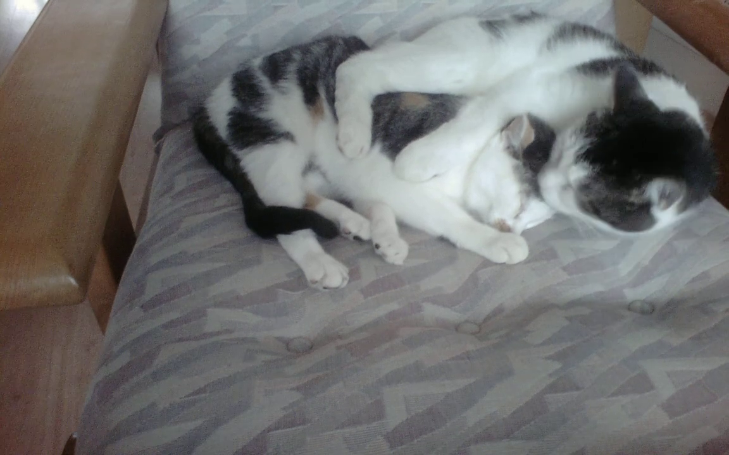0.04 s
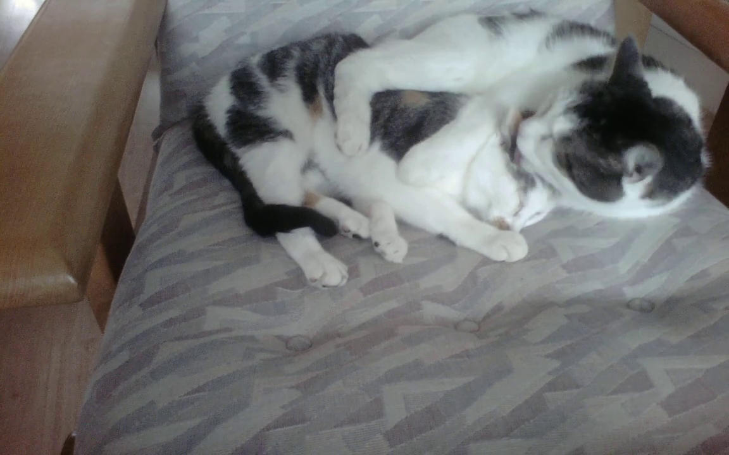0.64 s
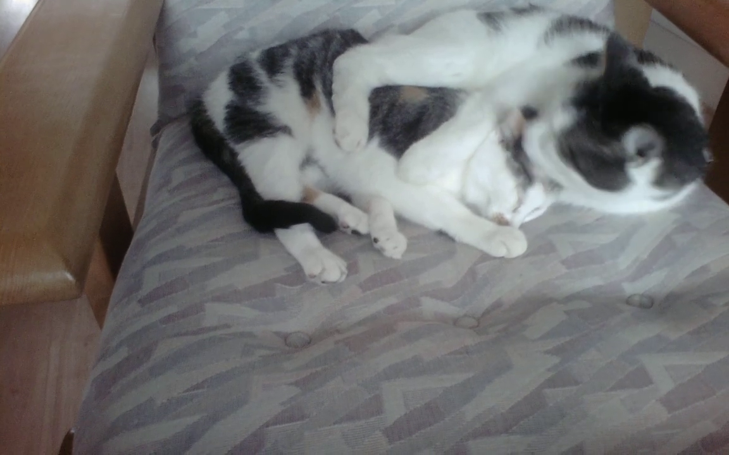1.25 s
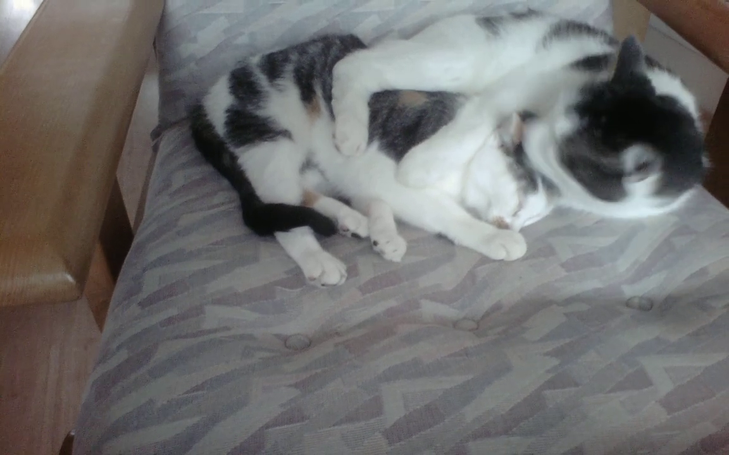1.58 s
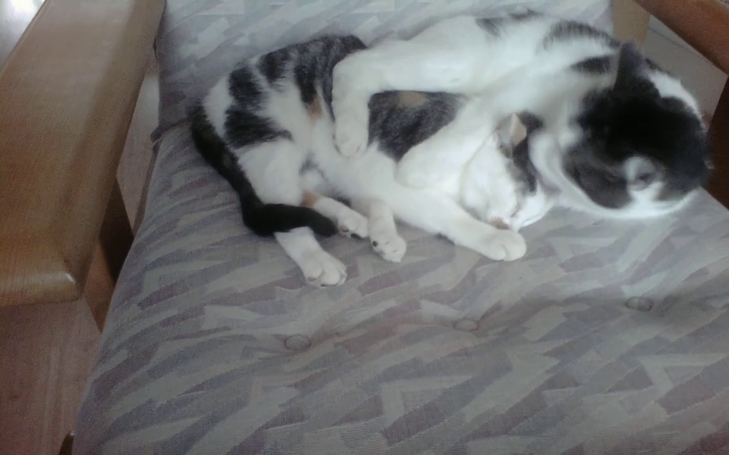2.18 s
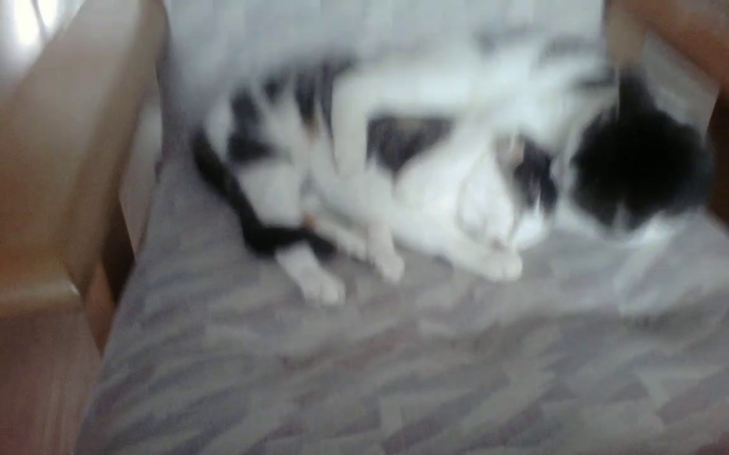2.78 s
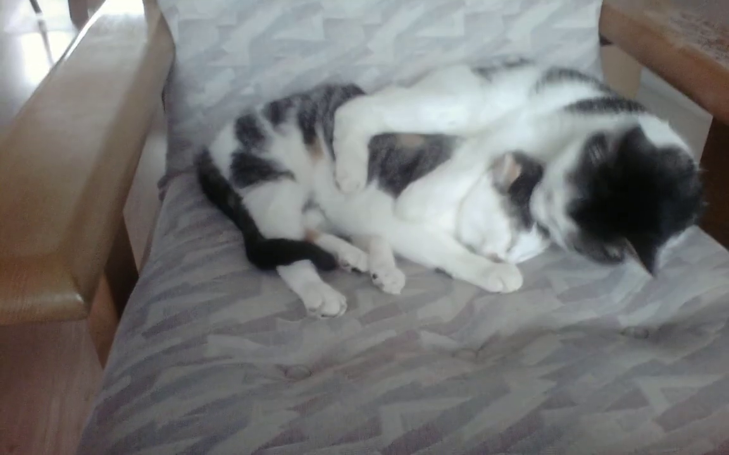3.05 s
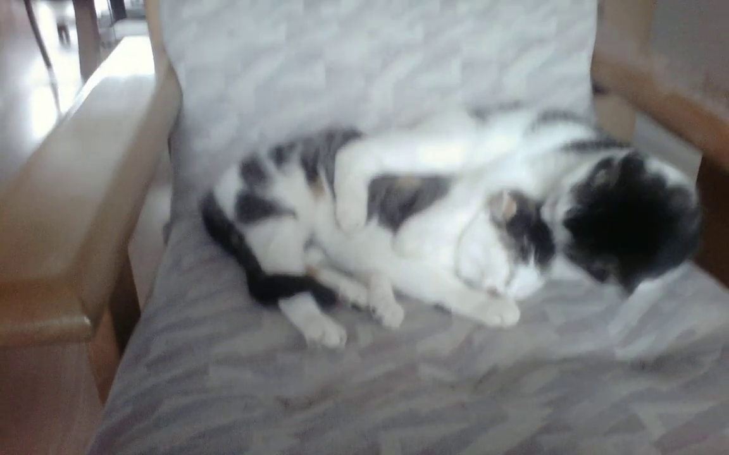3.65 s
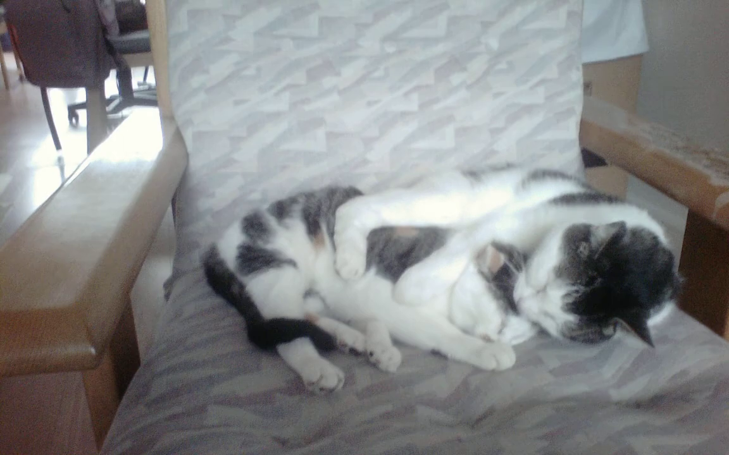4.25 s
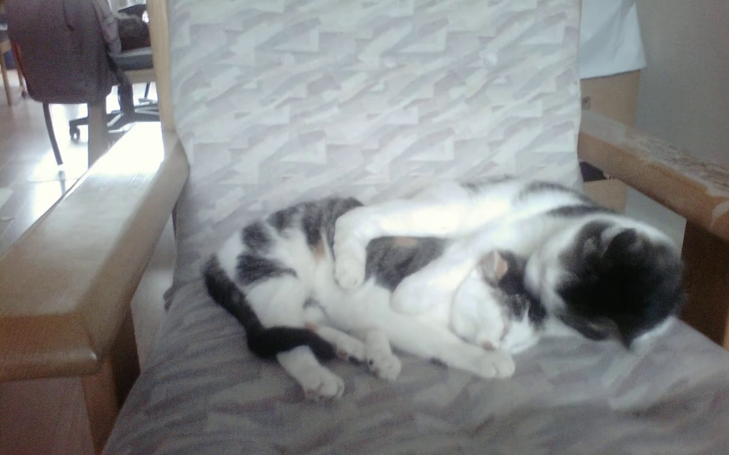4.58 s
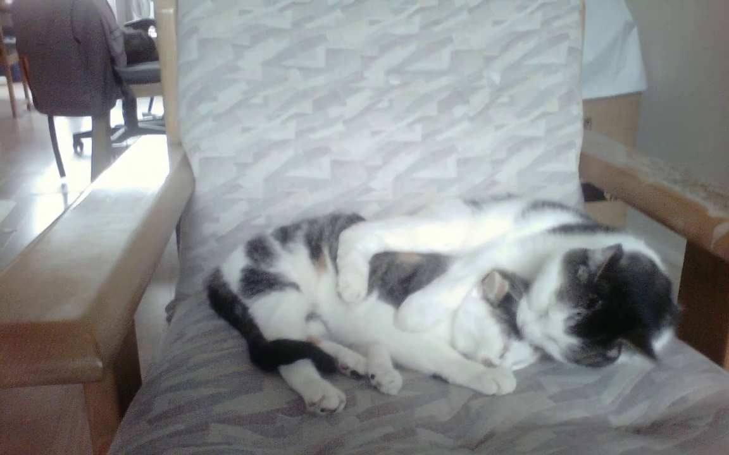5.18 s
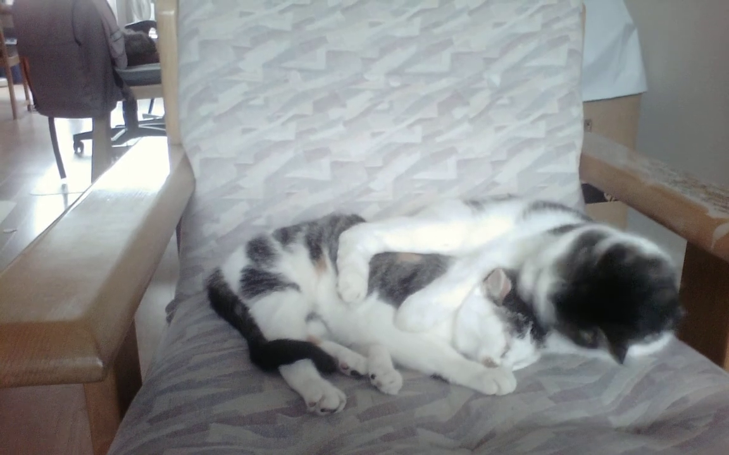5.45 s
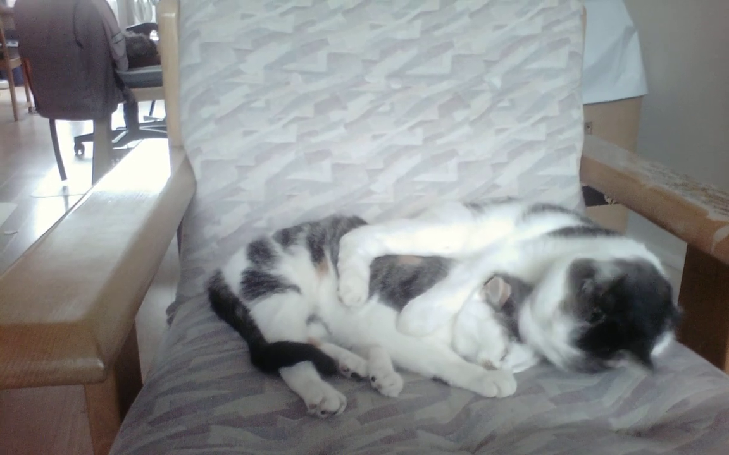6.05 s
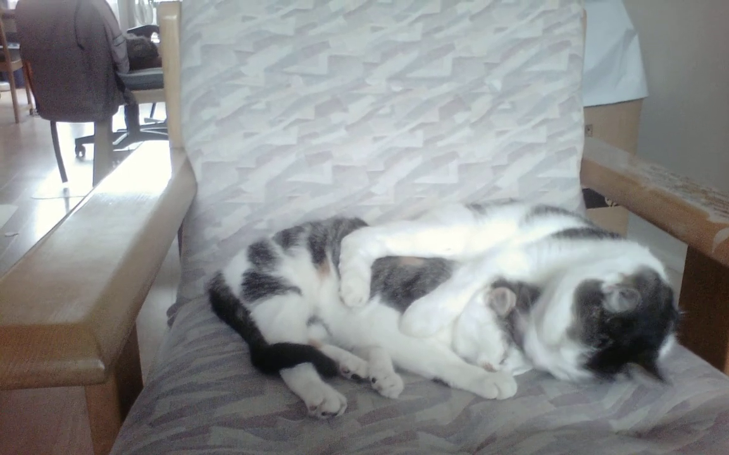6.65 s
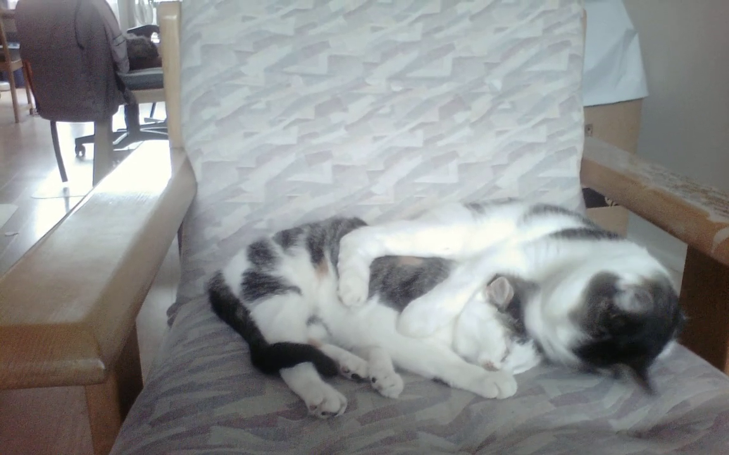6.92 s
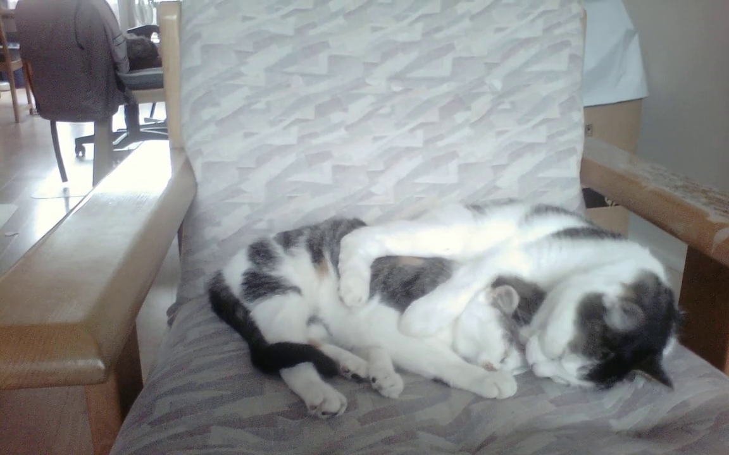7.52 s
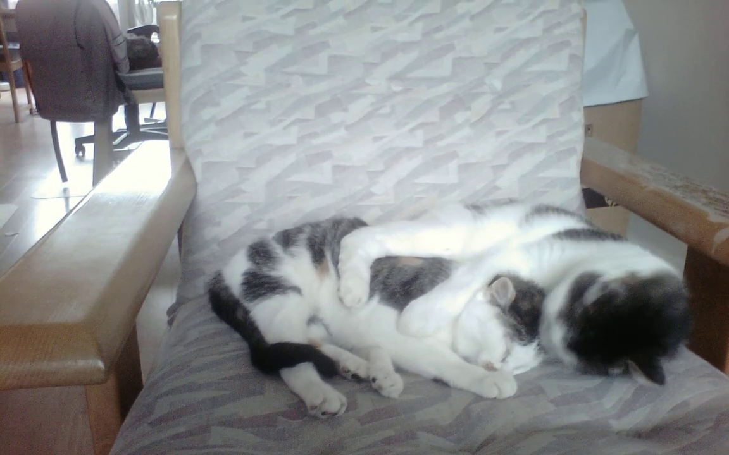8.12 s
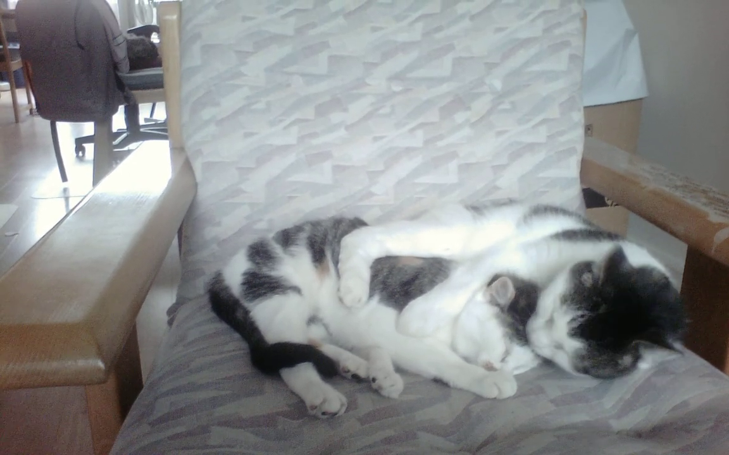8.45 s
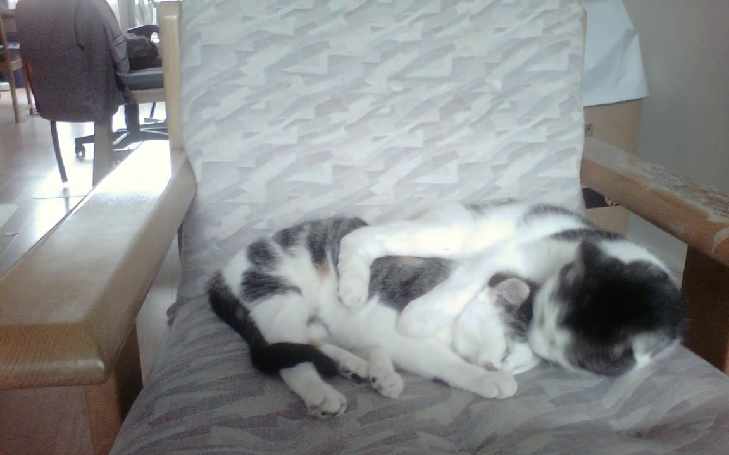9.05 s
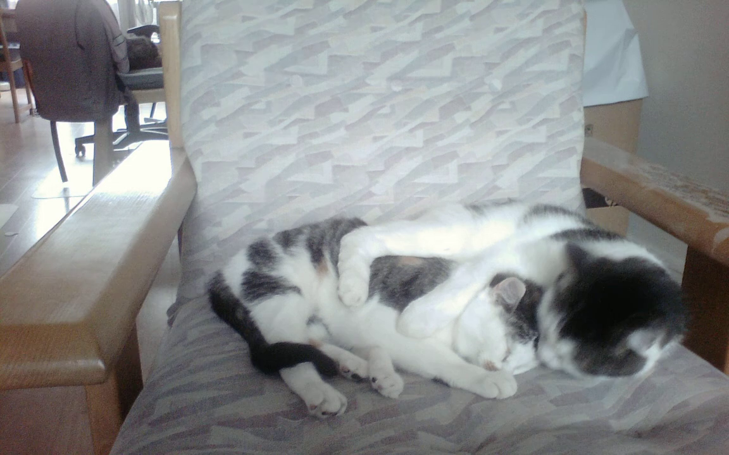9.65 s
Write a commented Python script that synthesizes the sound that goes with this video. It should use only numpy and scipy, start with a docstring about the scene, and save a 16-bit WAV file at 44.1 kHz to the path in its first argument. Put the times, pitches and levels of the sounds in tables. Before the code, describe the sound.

Small handling noises sound right at the microphone of a hand-held camera in a still living room. First comes a sharp plastic click with a short rub, then a cluster of softer clicks and thin finger squeaks, and later some faint ticks and scuffs. Underneath, a steady low-level hiss, room air, a slight hum and a high electronic whine carry on unchanged.

```python
"""Camera handling in a quiet living room.

A small hand-held camera is tilted while a cat rests, unheard, on an armchair. Seams of the plastic
case slip and click, ringing its modes; a finger sticks and slips on it, rubbing and squeaking.
The microphone's cavity rings near 4 kHz. Room air, hiss, a faint hum and electronic whine run on."""
import sys
import numpy as np
from scipy import signal
from scipy.fft import rfft, irfft
from scipy.io import wavfile

SR = 44100
rng = np.random.default_rng(int(sys.argv[2]) if len(sys.argv) > 2 else 0)


def dump_mix(stems):
    """Bounce the given channels to the path in sys.argv[1] as a 16-bit WAV at rate SR."""
    frames = np.atleast_2d(stems).T  # one column per channel
    limited = np.clip(frames, -1, 1)  # hard clip at full scale
    pcm = np.round(limited * 32767).astype(np.int16)
    wavfile.write(sys.argv[1], SR, pcm)


N = 436590
TIME_S = np.arange(N) / SR

# Case clicks. Each row: start in seconds, strength in dB, weight in dB, brightness in dB,
# place on the panel from 0 to 1.
CASE_CLICKS = [(2.3128, -45.5, 6, 12, 0.1), (2.33, -27.5, -3.5, -12, 0.2), (2.616, -51.5, -4, -18, .5),
               (3.6774, -33.5, -4, -15, 0.68), (4.335, -38, 2.5, -11, 0.6), (4.52, -50.5, 3.5, -3, .6),
               (4.5311, -36.5, -5.5, -4, 0.9), (4.6249, -49.5, -8, 4.5, 0.6), (4.877, -56.5, -3, 1, .5),
               (5.0946, -49, -0.5, -6.5, 0.7), (6.2185, -46.5, 3, 1, 1)]
# Click drive of thump, knock, panel, shell, ping and snap, in that order.
# Each row: offset in dB, share of the click's weight, share of its brightness.
MODE_DRIVE = [(-20.5, 2.35, 0.49), (-11, 1.3, 0.098), (-10, 1.38, -0.21), (0.5, 0, 0.014), (-5.5, 0, 0.37),
              (-0.4, 0.36, 0.93)]
# Case modes, low to high. Each row: frequency in Hz, relative level in dB, t60 in seconds.
THUMP_MODES = [(231, 0.5, 0.074), (338, -2, 0.063), (560, 1, 0.082)]
KNOCK_MODES = [(720, -6, 0.045), (940, -4.5, 0.025), (1403, 3.5, 0.007)]
PANEL_MODES = [(1844, -1, 0.02), (2390, 2, 0.016)]
SHELL_MODES = [(2620, -8, 0.0021), (3140, 7, 0.0046), (3760, 1, 0.017)]
PING_MODES = [(4040, -12, 0.049), (4055, 4, 0.034)]
SNAP_MODES = [(4700, 6.5, 0.0075), (5330, 4, 0.0089), (5720, 1, 0.0091)]
# Light touches. Each row: start in seconds, strength in dB.
TOUCH_TICKS = [(3.668, -59), (5.056, -61), (5.251, -59), (5.685, -62), (6.17, -59), (6.382, -60.5),
               (6.507, -57.5), (9.616, -62)]
# Finger strokes. Each row: start in seconds, length in seconds, relative levels of dull rub, squeak
# and scuff in dB, pressure change in dB, squeak pitch in Hz.
FINGER_STROKES = [(0.477, 0.33, -76, -62, -78, -2, 3960), (2.277, 0.039, -66, -67, -60.5, 23, 4080),
                  (2.353, 0.17, -46.5, -46.5, -45.5, -26, 4000), (2.446, .016, -64, -52, -58, -2, 5420),
                  (3.7, 0.22, -59.5, -48, -72, -6.5, 3970), (3.963, 0.12, -59, -50, -71, -10, 4130),
                  (4.14, .095, -57, -47, -74, -14.5, 4030), (4.547, .04, -67, -45, -69, -12, 4010),
                  (4.643, .055, -60, -46, -59, -18, 3990), (4.896, .1, -68, -52.5, -75, -4, 4010),
                  (6.448, .045, -63, -53, -55, -8, 5170), (6.535, 0.095, -62, -58.5, -56, -1.5, 4100),
                  (8.717, 0.4, -78, -62, -78, -9, 4040)]
# Noise spectra. Each row: frequency in Hz, relative density in dB.
AIR_SPECTRUM = [(15, -54), (25, -37), (91, -46), (110, -19), (126, -11.5), (193, -7), (229, -1.5),
                (337, -7), (441, -6), (818, -6), (1010, -2.5), (1200, -5), (1670, -5), (1950, -7),
                (2500, -15.5), (3250, -37), (5500, -120)]
MIC_HISS_SPECTRUM = [(1500, -14.5), (2300, -2), (3000, 1), (3600, 0.5), (4600, -1.5), (5600, -2.5),
                     (6200, -3), (7100, -7), (7700, -15), (8400, -22), (11000, -49)]
ELECTRONICS_SPECTRUM = [(100, -10), (4000, -0.5), (10000, 0.5), (16000, 0)]
# Noise level curves. Each row: time in seconds, level in dB before gain.
AIR_CURVE = [(0.0, -59), (2.53, -56.5), (2.76, -58.5), (4.19, -57.5), (5.16, -60), (6.2, -59), (6.78, -60),
             (9.9, -57.5)]
MIC_HISS_CURVE = [(0.0, -67), (2.18, -65), (5.65, -66.5), (6.26, -66), (7.66, -67), (9.9, -64.5)]
CAVITY_CURVE = [(0.0, -64.5), (2.42, -64), (3.03, -66), (3.69, -60.5), (3.86, -55.5), (5.27, -66.5),
                (8.38, -66.5), (8.82, -62), (9.9, -63)]
# Electronic whine; hum with one faint whistle. Each row: frequency in Hz, level in dB before gain.
WHINE_TONES = [(1034, -73), (2078, -74.5), (3112, -79.5), (4000, -67.5)]
HUM_TONES = [(224.3, -75), (244, -84.5), (313, -78), (8000, -95)]
# Dips in the microphone's response. Each row: frequency in Hz, width in Hz.
MIC_NOTCHES = [(2000, 28), (4000, 16), (6000, 36)]

CAVITY_HZ, CAVITY_WIDTH_HZ = 3993, 116


def case_clicks(place_db):
    """A seam slips and drives the case modes; its place favours the lower or upper panel mode."""
    out = np.zeros(N)
    for start_s, strength_db, weight_db, bright_db, place in CASE_CLICKS:
        force = slip_force(grit=0.15, grit_s=0.003, tail_db=-47, tail_s=0.064)
        panel = [(hz, db + place_db * share, t60_s)
                 for (hz, db, t60_s), share in zip(PANEL_MODES, (1 - place, place))]
        groups = THUMP_MODES, KNOCK_MODES, panel, SHELL_MODES, PING_MODES, SNAP_MODES
        for modes, (offset_db, weight_share, bright_share) in zip(groups, MODE_DRIVE):
            drive_db = strength_db + offset_db + weight_share * weight_db + bright_share * bright_db
            add(out, start_s, from_db(drive_db) * ring_modes(force, modes))
    return out


def touch_ticks():
    """Light touches reach only the brightest modes."""
    out = np.zeros(N)
    for start_s, strength_db in TOUCH_TICKS:
        force = slip_force(grit=0.12, grit_s=0.004, tail_db=-45, tail_s=0.03)
        add(out, start_s, from_db(strength_db) * ring_modes(force, SNAP_MODES))
    return out


def slip_force(grit, grit_s, tail_db, tail_s):
    """One slip: a sharp jolt, brief grit, a faint tail."""
    t = TIME_S[:SR // 4]
    envelope = grit * np.exp(-t / grit_s) + from_db(tail_db) * np.exp(-t / tail_s)
    return (t == 0) + envelope * rng.standard_normal(len(t))


def ring_modes(force, modes):
    """Decaying sines driven by a force; rms 1 over the first 20 ms."""
    t = TIME_S[:len(force)]
    response = sum((-1) ** k * from_db(db - 60 * t / t60_s) * np.sin(2 * np.pi * hz * t)
                   for k, (hz, db, t60_s) in enumerate(modes))
    band = signal.butter(1, [modes[0][0] * 0.85, modes[-1][0] * 1.15], "band", fs=SR, output="sos")
    out = signal.sosfilt(band, signal.fftconvolve(force, response)[:len(t)])
    return out / np.std(out[:SR // 50])


def cavity_delay(x, widths_hz):
    """The microphone cavity holds back sound near its pitch, so clicks chirp towards it."""
    for width_hz in widths_hz:
        x = x - 2 * resonate(x, CAVITY_HZ, width_hz)  # all-pass
    return x


def finger_rubs(gains_db, squeak_width_hz, body_db=-7.5, scratch_db=-13):
    """Friction excites the case and squeaks scratchily, mostly near the cavity's pitch."""
    slips = stick_slip(rate_per_s=3000, spread_db=2.5)
    shell = double_resonance(slips, hz=(2860, 2860), widths_hz=(900, 900))
    body = from_db(body_db) * unit_rms(resonate(slips, hz=430, width_hz=370))
    scuff = double_resonance(slips, hz=(5100, 4750), widths_hz=(550, 2000))
    scratch = from_db(scratch_db) * double_resonance(slips, hz=(4300, 4300), widths_hz=(830, 830))
    out = np.zeros(N)
    for start_s, length_s, *levels_db, change_db, pitch_hz in FINGER_STROKES:
        layers = shell + body, squeak(pitch_hz, squeak_width_hz) + scratch, scuff
        rub = sum(from_db(db + gain_db) * x for db, gain_db, x in zip(levels_db, gains_db, layers))
        out += stroke_pressure(start_s, length_s, change_db) * rub
    return out


def stick_slip(rate_per_s, spread_db):
    """Skin sticks and slips in tiny, uneven jolts."""
    sizes = from_db(spread_db * np.minimum(rng.exponential(1, N), 4)) * rng.standard_normal(N)
    return sizes * (rng.random(N) < rate_per_s / SR)


def squeak(pitch_hz, width_hz):
    """Narrow, unsteady whistle; rms 1."""
    flutter = low_pass(rng.standard_normal((2, N)), width_hz / 2, order=2)
    phase = 2 * np.pi * pitch_hz * TIME_S
    return unit_rms(flutter[0] * np.cos(phase) + flutter[1] * np.sin(phase))


def stroke_pressure(start_s, length_s, change_db, attack_s=0.018, release_s=0.0088):
    """Pressure sets in, grows or sags, and dies as the finger lifts."""
    t = TIME_S - start_s
    attack = np.clip(1 + t / attack_s, 0, 1)
    release = np.exp(-np.clip((t - length_s) / release_s, 0, 20))
    return attack * from_db(change_db * np.clip(t / length_s, 0, 1)) * release


def air_and_hiss(air_gain_db, hiss_gain_db, cavity_gain_db):
    """Room air, microphone hiss, and hiss ringing in the cavity."""
    air = curve_gain(AIR_CURVE, air_gain_db) * coloured_noise(AIR_SPECTRUM)
    hiss = curve_gain(MIC_HISS_CURVE, hiss_gain_db) * coloured_noise(MIC_HISS_SPECTRUM)
    white = rng.standard_normal(N)
    ring = double_resonance(white, hz=(CAVITY_HZ, CAVITY_HZ), widths_hz=(CAVITY_WIDTH_HZ, 1200))
    return air + hiss + curve_gain(CAVITY_CURVE, cavity_gain_db) * ring


def steady_tones(tones, gain_db, wander_rad):
    """Whine or hum: sines whose phase drifts at random, by wander_rad rms after one second."""
    drifts = wander_rad * np.cumsum(rng.standard_normal((len(tones), N)), axis=1) / np.sqrt(SR)
    return sum(from_db(db + gain_db) * np.sqrt(2) * np.sin(2 * np.pi * hz * TIME_S + drift)
               for (hz, db), drift in zip(tones, drifts))


def coloured_noise(spectrum):
    """Steady noise of a given spectrum; rms 1."""
    hz, db = np.transpose(spectrum)
    bins_hz = np.maximum(np.arange(N // 2 + 1) * SR / N, 1)
    gains = from_db(np.interp(np.log(bins_hz), np.log(hz), db))
    return unit_rms(irfft(rfft(rng.standard_normal(N)) * gains, N))


def resonate(x, hz, width_hz):
    """One resonance; peak gain 1."""
    radius = np.exp(-np.pi * width_hz / SR)
    numerator = np.array([1, 0, -1]) * (1 - radius ** 2) / 2
    denominator = [1, -2 * radius * np.cos(2 * np.pi * hz / SR), radius ** 2]
    return signal.lfilter(numerator, denominator, x + 1e-18)


def double_resonance(x, hz, widths_hz):
    """Two resonances in series; rms 1."""
    first = resonate(x, hz[0], widths_hz[0])
    return unit_rms(resonate(first, hz[1], widths_hz[1]))


def low_pass(x, hz, order):
    return signal.sosfilt(signal.butter(order, hz, fs=SR, output="sos"), x)


def curve_gain(curve, gain_db):
    times_s, levels_db = np.transpose(curve)
    return from_db(np.interp(TIME_S, times_s, levels_db) + gain_db)


def from_db(db):
    return 10 ** (np.asarray(db) / 20)


def unit_rms(x):
    return x / np.sqrt(np.mean(x ** 2) + 1e-20)


def add(out, start_s, sound):
    at = round(start_s * SR)
    out[at:at + len(sound)] += sound[:N - at]


def scene():
    """Handling and background at one microphone, fed to both channels."""
    clicks = case_clicks(place_db=16) + touch_ticks()
    clicks = cavity_delay(clicks, widths_hz=[2200, 1600, 1200, 890, 650, 300])
    rubs = finger_rubs(gains_db=[-1.0, -0.8, -0.5], squeak_width_hz=174)
    low_cut = signal.butter(4, 160, "high", fs=SR, output="sos")
    handling = signal.sosfilt(low_cut, low_pass(clicks + rubs, hz=6500, order=12))
    sound = handling + air_and_hiss(air_gain_db=-0.26, hiss_gain_db=4.5, cavity_gain_db=-1.1)
    for hz, width_hz in MIC_NOTCHES:
        sound = sound - resonate(sound, hz, width_hz)
    whine = steady_tones(WHINE_TONES, gain_db=-0.95, wander_rad=1.07)
    hum = steady_tones(HUM_TONES, gain_db=-1.5, wander_rad=2.51)
    electronics_hiss = from_db(-74) * coloured_noise(ELECTRONICS_SPECTRUM)
    return np.tile(sound + whine + hum + electronics_hiss, (2, 1))


def record(dry):
    """Steep treble cut."""
    cutoff_hz = 15750
    return signal.sosfilt(signal.ellip(12, 0.1, 70, cutoff_hz, fs=SR, output="sos"), dry)


dry = scene()
out = record(dry)
dump_mix(out)
```